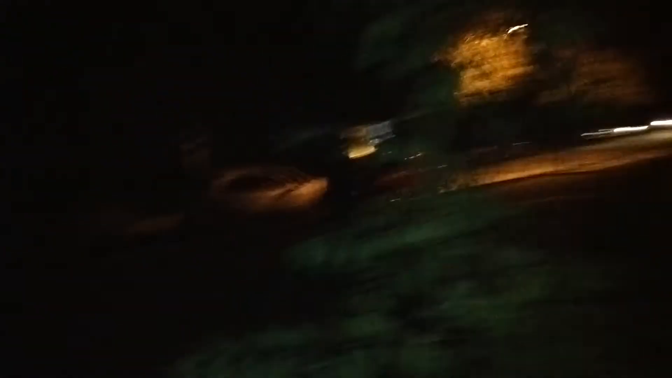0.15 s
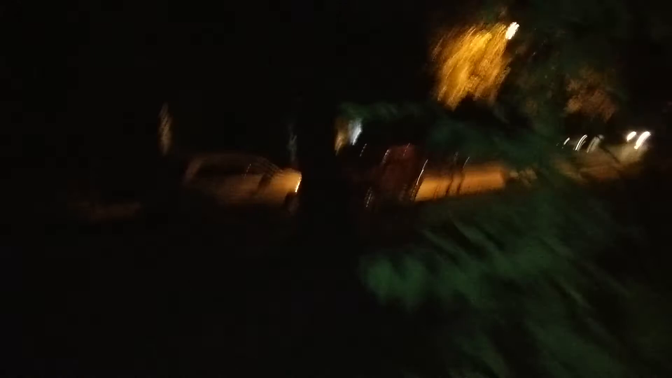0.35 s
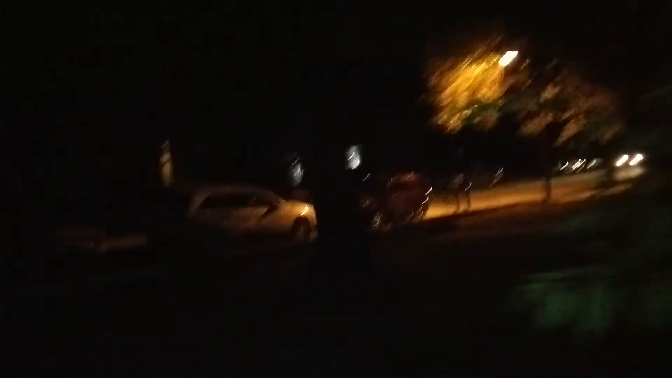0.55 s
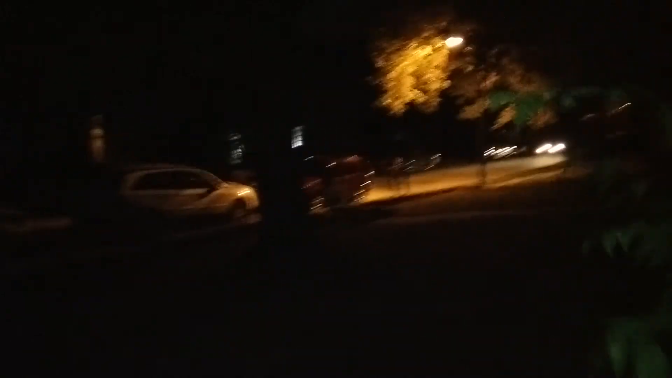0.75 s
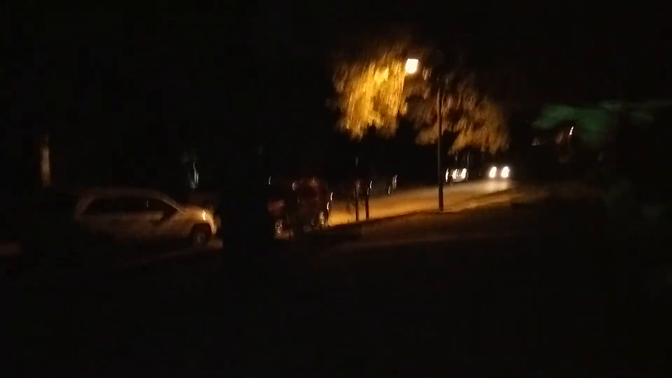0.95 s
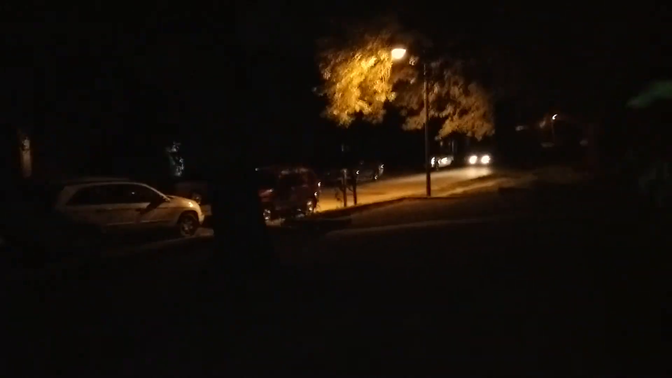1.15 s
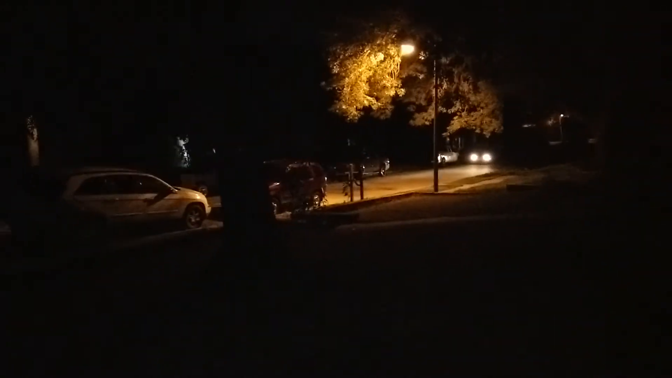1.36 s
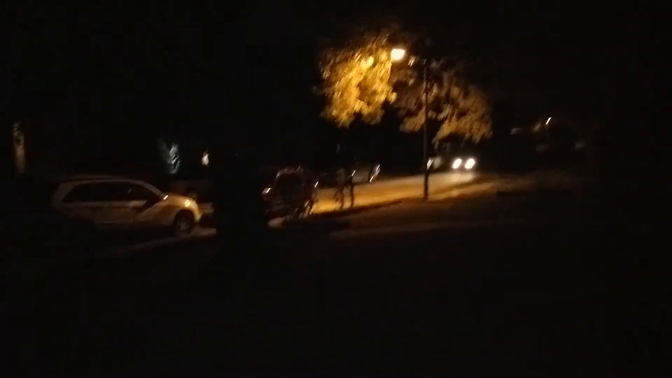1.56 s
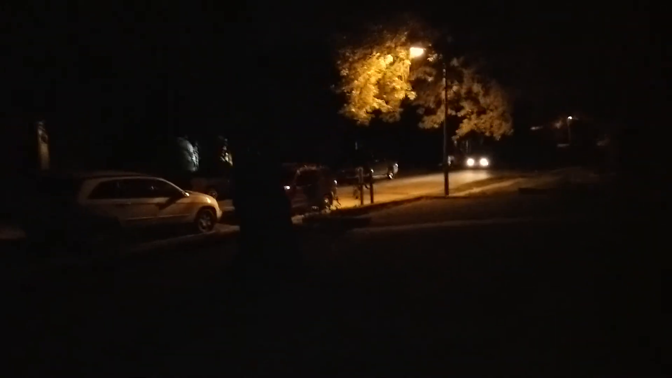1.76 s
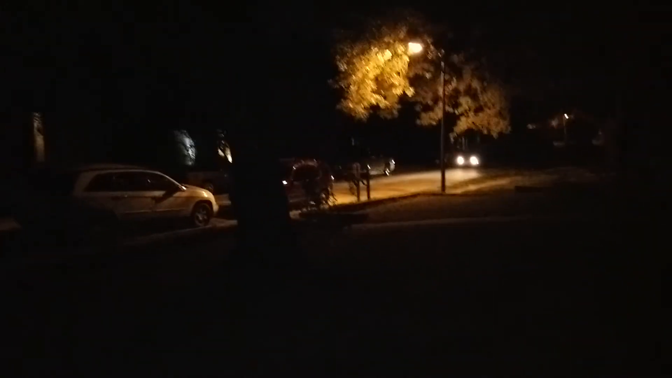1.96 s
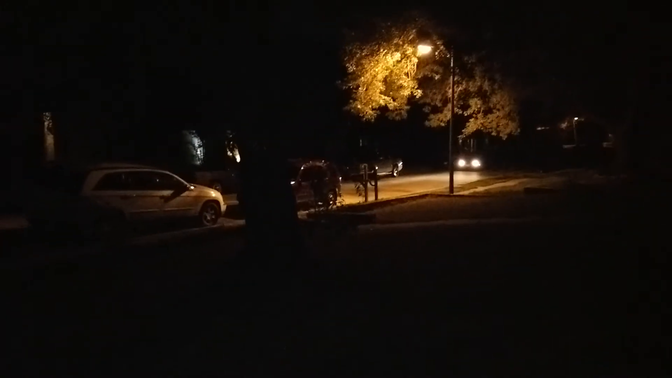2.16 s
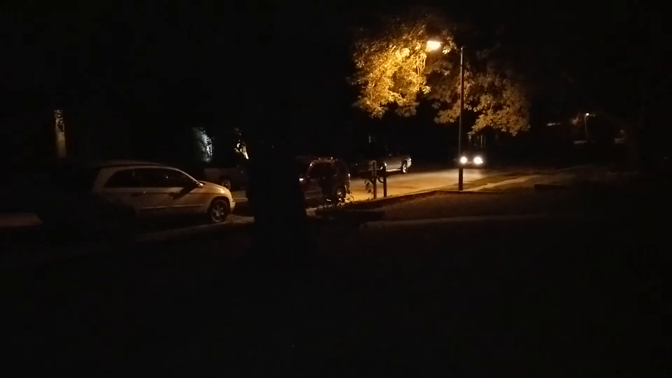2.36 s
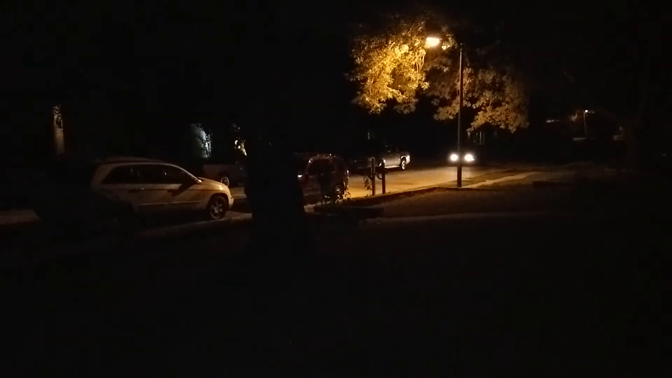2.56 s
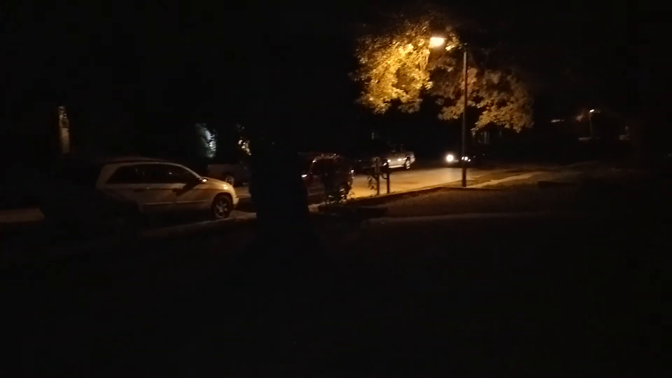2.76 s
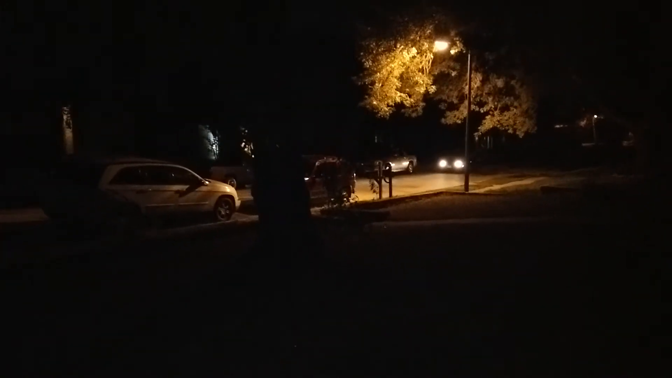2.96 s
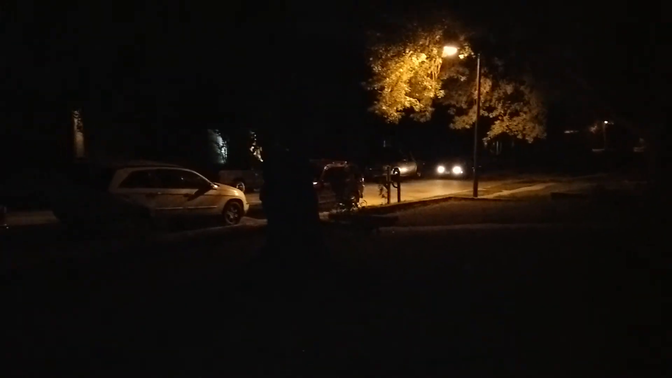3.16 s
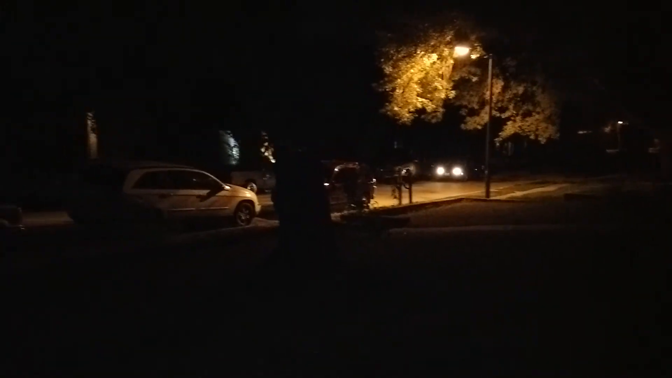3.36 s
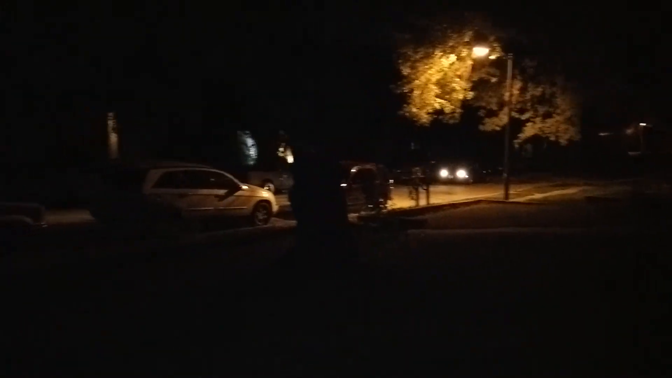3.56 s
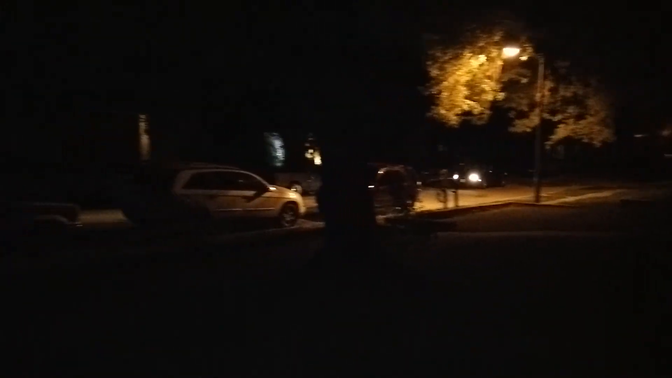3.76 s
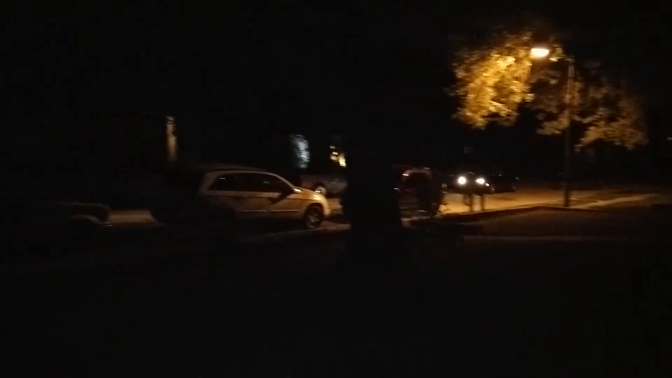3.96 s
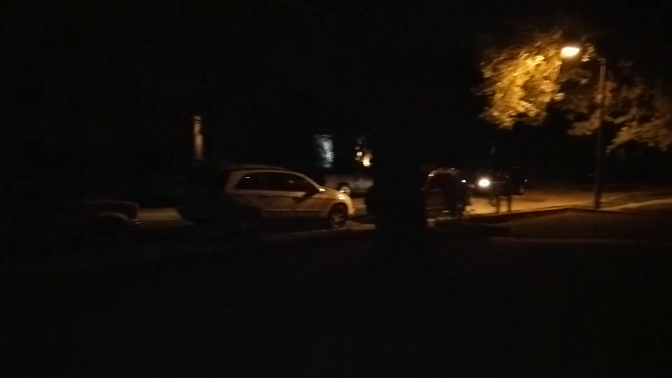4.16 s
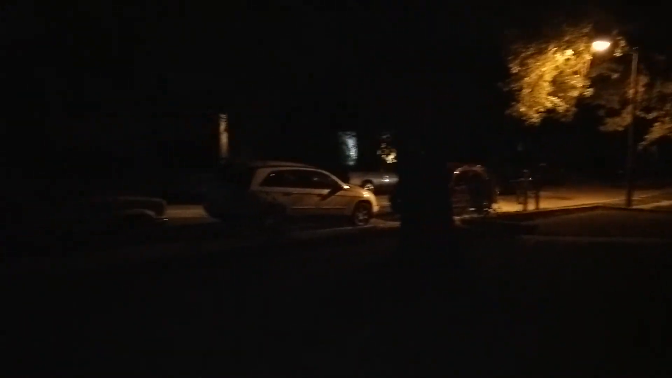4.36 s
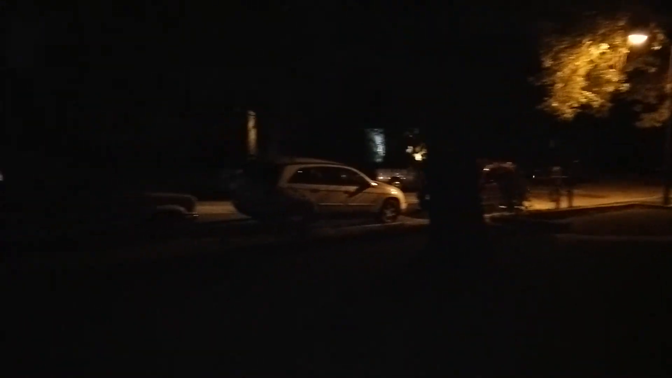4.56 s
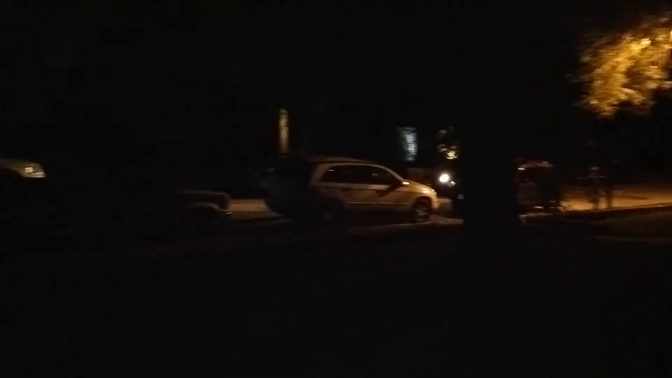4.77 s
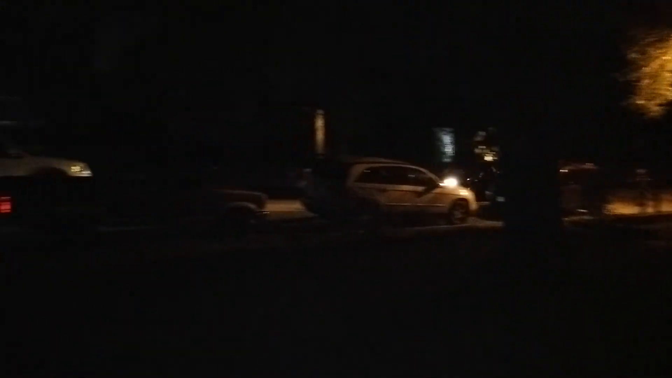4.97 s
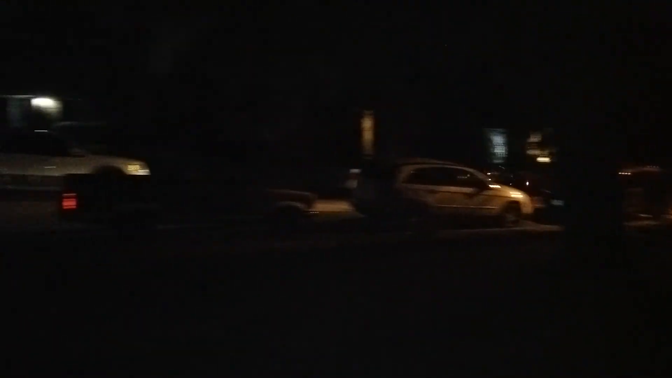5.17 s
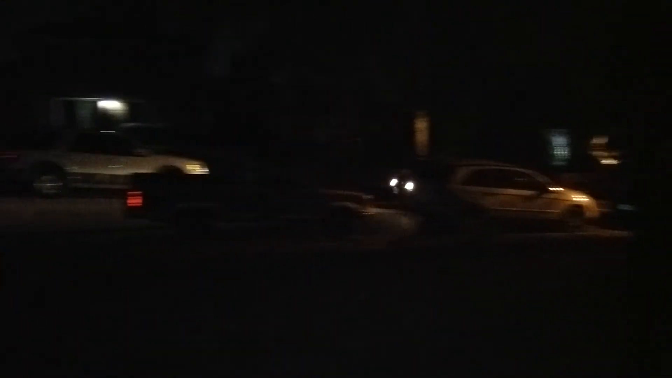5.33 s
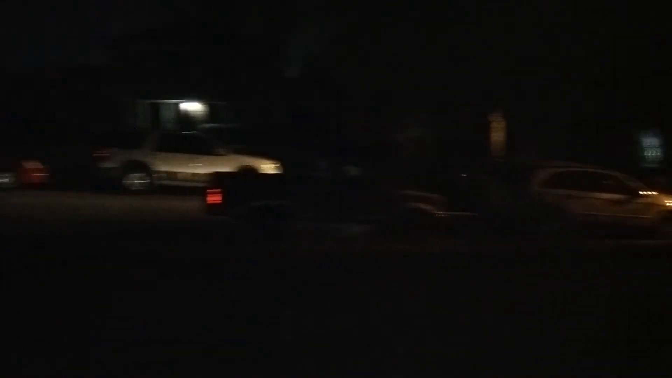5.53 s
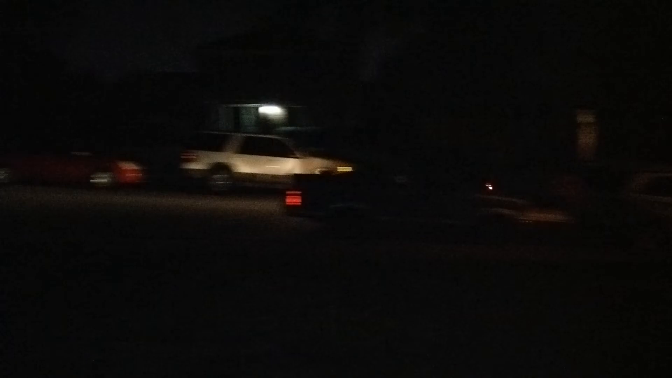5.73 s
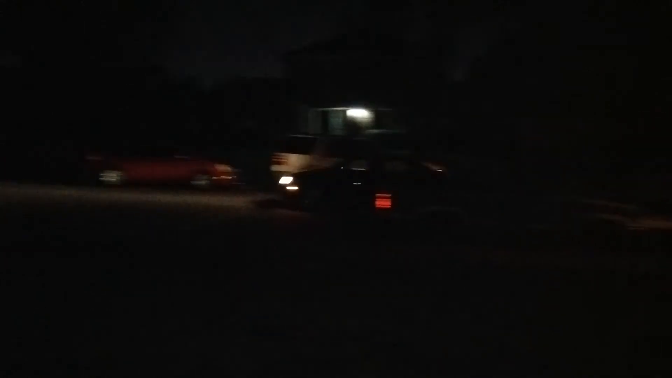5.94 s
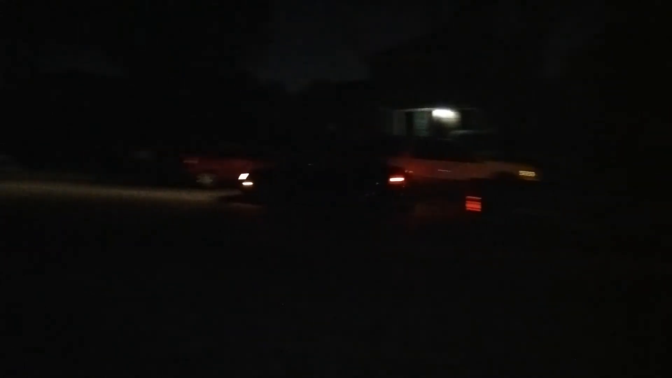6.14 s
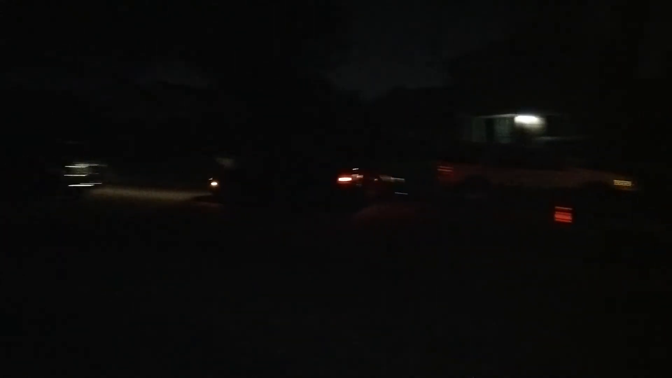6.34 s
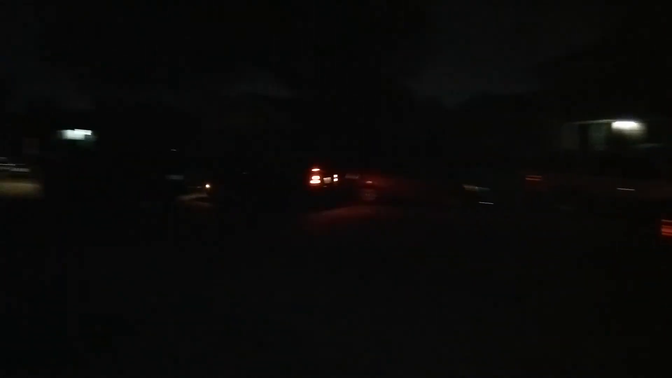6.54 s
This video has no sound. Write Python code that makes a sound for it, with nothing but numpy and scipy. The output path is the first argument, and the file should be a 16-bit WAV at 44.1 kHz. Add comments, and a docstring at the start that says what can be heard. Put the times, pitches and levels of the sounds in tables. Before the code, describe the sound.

Night street, microphone close to foliage, nearly everything in the right channel with the left faint and muffled. From 0 to 0.7 s, small twig ticks, knocks and leaf brushes over soft hiss, low rumble and a soft hand bump; a very faint far whine rises and falls. Thin insect trills stay barely audible. A distant car's low, steady bass drone emerges by 1 s, wavering slightly with a faint rattle, while leaves crackle most around 1.3-1.6 s and brush lightly until 2.2 s. At about 3.15 s the throttle opens: boomy exhaust bark, howl and tearing rasp burst in, pitch climbing in steps, the boom fluttering with echoes. From 4.3 s it grows nearer, brighter and harsher, peaking in a slightly overloaded roar at 5.7-6.05 s. The driver lifts off as it passes; pitch falls, with ragged burble, sharp pops at 6.3 s and smaller ones until the end at about 6.6 s.

```python
"""A six-cylinder car with a loud exhaust drones up a night street, opens up, roars past and lifts off.
Sine orders make the boom; pulses through the pipe's colours, with clean orders, make the bark; gated noise
makes the rasp. On the overrun ragged pulses burble and noise bursts pop.
Leaves and twigs, of noise and short decaying tones, rustle beside the microphone over hiss, rumble,
insects and a far whine. The left port is muffled, and the loudest peaks are rounded off."""
import sys
import numpy as np
from scipy import signal
from scipy.fft import rfft, irfft
from scipy.io import wavfile
from scipy.ndimage import uniform_filter1d

SR = 44100
rng = np.random.default_rng(int(sys.argv[2]) if len(sys.argv) > 2 else 0)


def store_wav(level_fs):
    """Save 16-bit WAV to argv[1]."""
    pcm = np.round(np.clip(np.atleast_2d(level_fs), -1, 1) * 32767)
    wavfile.write(sys.argv[1], SR, pcm.T.astype(np.int16))


N = 291060
TIME = np.arange(N) / SR

# Levels throughout are mix levels, ahead of the output gain; colours and swells are relative.
OUTPUT_DB = 7.0

# engine speed as heard: (time [s], firing rate [Hz])
FIRING = [(0, 109.4), (1.2, 114.3), (2.5, 114), (3.12, 116.7), (3.25, 121.7), (3.45, 122), (3.7, 134.3),
          (3.92, 135.8), (4.3, 154.2), (4.88, 181.3), (5.2, 182), (5.4, 197), (5.75, 215), (6.0, 212.4),
          (6.14, 186), (6.6, 155.5)]
# one engine cycle with unequal headers, scaled where used: (strength [dB], lateness [firing periods])
CYLINDERS = [(5, 0.073), (4.5, -0.046), (-3, -0.079), (-4, 0.029), (0.5, 0.09), (-1, -0.054)]
# the driver floors the throttle, then lifts off
OPEN_AT_S, OPEN_TAKES_S = 3.15, 0.051
LIFT_AT_S, LIFT_TAKES_S = 6.02, 0.079
# the pass: the moment when the car is nearest, its distance then, its speed
PASS_AT_S, DISTANCE_M, SPEED_M_PER_S = 6.074, 18.5, 15.8
TOP_HZ = 212.3  # firing rate at which the loudness laws below are set

# boom at light throttle, which also shapes the rattle: (time [s], level [dB])
DRONE = [(0.3, -36), (0.97, -32.5), (1.01, -29.5), (2.6, -29.5), (2.69, -26.5), (2.79, -31.5), (2.9, -27.5),
         (2.97, -32), (3.1, -28.5)]
# octave of the drone: (time [s], level [dB])
DRONE_OCTAVE = [(.25, -52), (.9, -50.5), (2.05, -60.5), (2.4, -55), (3.12, -51.5)]
# pipe resonances that the firing tone climbs through under load: (frequency [Hz], level [dB])
PIPE = [(121, -18.5), (124, -17), (135, -18), (142, -24.5), (160, -17.5), (172, -15), (186, -15),
        (212, -15.5)]
# the same for its octave: (frequency [Hz], level [dB])
PIPE_OCTAVE = [(240, -39.5), (252, -28.5), (272, -31), (296, -37), (400, -55)]
DRONE_TRIM_DB, PIPE_TRIM_DB = 1.0, 3.0  # added to the firing tone's drone and pipe levels
# the boom fades briefly as echoes cancel it: (time [s], half length [s], change [dB])
FADES = [(3.66, 0.044, -4), (3.795, 0.012, -7), (3.96, 0.063, -13), (4.15, 0.054, -8), (4.315, 0.019, -10),
         (4.825, 0.015, -15), (4.96, 0.032, -9), (5.05, 0.019, -14), (5.16, 0.034, -18.5),
         (5.308, .016, -11), (5.432, 0.017, -12), (5.515, 0.015, -14), (5.585, .025, -9.5),
         (5.81, .028, -9.5)]
# the lope of uneven firing swells or sinks: (time [s], half length [s], change [dB])
LOPES = [(5.35, 0.042, 10.5), (5.59, 0.072, -15)]
LOPE_DB, LOPE_DB_PER_OCTAVE, LOPE_LEAST_DB = -28.5, 139, -44.5

# bark of the pipe, far off: (frequency [Hz], level [dB])
BARK_FAR = [(50, -46), (170, -27), (280, 5), (400, 1), (500, -4), (600, 1), (800, -7), (1040, -7),
            (1400, -10.5), (2000, -13), (3000, -29)]
# bark of the pipe, near: (frequency [Hz], level [dB])
BARK_NEAR = [(170, -26.5), (300, 1.5), (420, -0.5), (510, -4.5), (620, 6), (730, -5), (850, 0.5),
             (1040, -5.5), (1200, -2.5), (1450, -18), (2000, -5), (2600, -1.5), (4000, -29.5)]
# clean orders within the bark: (multiple of the firing rate, far level [dB], near level [dB])
HOWL = [(2, -65, -10), (3, -1.5, -17), (4, -2, -17), (5, -10, -5.5), (6, -16, -9.5), (7, -25, -13),
        (10, -16, -16)]
# the exhaust flares up or slackens: (time [s], half length [s], bark change [dB], rasp change [dB])
FLARES = [(3.73, 0.6, 2, 5.5), (4.404, 0.29, 0, 4.5), (4.787, .06, -2.5, -2), (5.126, 0.11, 3, 4),
          (5.296, 0.041, -0.5, 0), (5.425, 0.057, -0.5, -1.5), (5.578, .065, 4.5, 7.5),
          (5.941, 0.026, -5, 5), (6.046, 0.045, 4.5, 6.5)]
BARK_DB, BARK_DB_PER_OCTAVE = -23.5, 10.5
ROUGH_DB, ROUGH_DB_PER_OCTAVE = -4, 2  # the bark grows rougher with the revs
HOWL_DB, HOWL_DB_PER_OCTAVE = -6, -2.5  # and its clean orders stand out less

# rasp of the gas, far off: (frequency [Hz], level [dB])
RASP_FAR = [(80, -40), (530, -13), (900, -5), (1130, -1.5), (1240, -25), (1320, -7), (2060, -2.5),
            (2410, -7.5), (2980, -4.5), (3370, -1), (4600, -9), (6280, -2.5), (6660, -3.5), (8990, -20.5),
            (15100, -35), (15800, -78.5)]
# rasp of the gas, near: (frequency [Hz], level [dB])
RASP_NEAR = [(530, -23.5), (900, -15), (1030, 0.5), (1130, -6), (1370, -11.5), (1800, -3), (1960, -7),
             (2110, -3), (2520, -17.5), (3130, -7.5), (5120, -11.5), (6200, -7), (9100, -25.5),
             (12000, -33.5), (15800, -37)]
# narrow tailpipe resonances, each stirred most at certain revs:
# (frequency [Hz], width [Hz], level against the rasp [dB], firing rate [Hz], reach [octaves])
TAILPIPE = [(960.2, 220, -13, 159, 0.19), (2000, 170, -10.5, 157, 0.22), (3043.5, 730, -19.5, 156.25, 0.25),
            (3747, 130, -9.5, 127, 0.19), (4180, 160, -16.5, 135, 0.47)]
RASP_DB, RASP_DB_PER_OCTAVE = -22.5, 14
RASP_BUILD_S = 0.047  # the gas flow takes a moment to build
RASP_FALL_DB_PER_S, RASP_SHUT_DB = 58, -25  # after lifting off, down to a murmur

# burble with the throttle shut: (frequency [Hz], level [dB])
BURBLE_COLOUR = [(30, -39), (60, -10), (88, -6), (125, 2), (165, 5), (210, -16.5), (300, -22), (500, -61.5)]
# blat of the pipe with the throttle shut: (frequency [Hz], level [dB])
BARK_SHUT = [(170, -30), (260, 5), (350, -6.5), (430, 3.5), (600, 6.5), (780, -8.5), (1000, -7),
             (1300, -11), (2000, -11.5), (3500, -28), (7000, -37)]
# backfires: (time [s], crack level [dB], crack decay [s], pipe blat level [dB])
POPS = [(6.313, -14, 0.0054, -17.5), (6.331, -26, 0.04, -37), (6.4, -38, 0.022, -20),
        (6.497, -49, 0.012, -30)]
# crack of a backfire: (frequency [Hz], level [dB])
POP_COLOUR = [(200, -1), (600, 15.5), (1600, 8.5), (2600, 7), (4000, 5), (6800, 12), (9000, -4),
              (15500, -9)]
BURBLE_DB, BURBLE_LUMPS_DB = -17, -0.1
BLAT_DB, BLAT_FALL_DB_PER_S, BLAT_LEAST_DB = -9, 136, -39.5
POP_BLAT_RISE_S, POP_BLAT_S = 0.011, 0.015

# cylinder rattle at light throttle: (frequency [Hz], level [dB])
CRUISE_COLOUR = [(75, -30.5), (133, 8.5), (185, -10.5), (245, -19), (290, -0.5), (340, 4), (400, -8),
                 (520, -12.5), (600, -23), (670, -13), (800, -41)]
RATTLE_DB, RATTLE_DB_PER_S = -24.5, 1.4  # against the drone, growing as the car comes on

# leaves brushing by: (time [s], level [dB], half length [s], crackle share [0-1])
RUSTLES = [(0.027, -52, 0.018, 0.35), (0.28, -61, 0.018, 0.7), (.42, -51.5, 0.011, 0.4),
           (0.886, -59, 0.036, .8), (1.176, -56, 0.018, 0.2), (1.355, -43, 0.024, 0.36),
           (1.45, -49.5, 0.057, 0.77), (1.547, -47.5, 0.021, 0.6), (1.609, -42.5, 0.022, 0.24),
           (1.733, -54, .012, .1), (1.982, -57, .025, 0.1), (2.197, -48, 0.02, 0)]
# swish of leaves: (frequency [Hz], level [dB])
LEAF_COLOUR = [(800, -31), (4000, -10), (5500, 0), (7000, 5.5), (9000, -4.5), (12000, -21), (15500, -18)]
# crackle of leaves: (frequency [Hz], level [dB])
CRACKLE_COLOUR = [(400, -12), (1300, -2), (4000, -9), (7000, 4), (10000, -4.5), (15500, -14)]
# twig ticks and soft knocks: (time [s], starting level [dB], pitch [Hz])
TICKS = [(.077, -38, 1130), (0.159, -56, 4770), (0.271, -38, 6160), (0.284, -35, 6030), (0.317, -39, 6700),
         (.433, -41, 7000), (.46, -43, 6300), (.484, -37, 880), (0.527, -36, 900), (0.687, -46, 6500)]

# hiss of the street: (frequency [Hz], level [dB])
NIGHT = [(30, -17), (120, 5), (300, 13), (700, 1), (1700, -2), (2500, -5.5), (3400, -3), (4600, -4),
         (5500, -0.5), (6600, 0.5), (8000, -8), (10000, -18.5), (15800, -17.5)]
HISS_DB, HISS_DB_PER_S = -56.5, 2.24  # growing as the car comes on
# town rumble, then the bump of a hand: (frequency [Hz], level [dB])
RUMBLE_COLOUR = [(25, -32), (55, -5), (120, 5), (400, -49)]
THUD_COLOUR = [(25, -24), (70, 7), (130, 0.5), (400, -42.5)]
# insects trilling far off: (pitch [Hz], width [Hz], first level [dB], later level [dB])
INSECTS = [(3110, 100, -93, -66), (4120, 90.3, -69, -65), (5370, 240, -64.5, -65)]
# a faint far whine that rises and falls: (time [s], pitch [Hz], level [dB])
WHINE = [(.2, 480, -70), (.4, 521, -64), (.65, 580, -60.5), (.9, 539, -61), (1.15, 488, -67)]

# decay of the street's echo: (frequency [Hz], time to fall 60 dB [s])
STREET = [(100, 1), (1000, 1), (4000, 1), (12000, 0.43)]
# muffled left port against the right: (frequency [Hz], gain [dB])
LEFT_PORT = [(50, -15), (110, -14), (200, -21.5), (380, -28.5), (700, -35), (2400, -43), (4400, -52),
             (8000, -87), (15000, -36)]
# self-noise in the left port: (frequency [Hz], level [dB])
SELF_NOISE_COLOUR = [(20, -4), (60, -6), (300, -16), (1500, -28.5), (8000, -36.5), (14000, -33)]
EDGE_HZ = 15800  # upper band limit


def boom(turns, throttle):
    """The pipe's lowest orders, nearly pure; echoes of the rising pitch lag behind and blur it."""
    angle, hz = 2 * np.pi * turns, curve(FIRING)
    cycle = 1 / len(CYLINDERS)
    # sidebands one engine cycle above and below the firing rate
    cycle_beat = 0.078 * np.sin(angle * (1 + cycle)) + 0.089 * np.sin(angle * (1 - cycle))
    tone = steady(street(np.sin(angle), wet_db=-3.5), size=1600) / np.sqrt(2)
    drone_gain = amp(DRONE_TRIM_DB) * level(DRONE)
    load_gain = amp(PIPE_TRIM_DB) * throttle * amp(read(PIPE, hz)) * swells(FADES)
    firing_tone = (drone_gain + load_gain) * (tone + cycle_beat)

    octave = steady(street(np.sin(2 * angle + 0.55 * wander(19)), wet_db=-4.5))
    octave_gain = level(DRONE_OCTAVE) + throttle * amp(read(PIPE_OCTAVE, 2 * hz))

    half_order = np.sin(angle / 2 + 0.44 * wander(27))
    third_order = 0.094 * nearness() * np.sin(2 * angle * cycle)
    lope = (1 + 0.43 * wander(11.0)) * (half_order + third_order)
    lope_level = amp(LOPE_LEAST_DB) + amp(LOPE_DB + LOPE_DB_PER_OCTAVE * revs())
    lope_gain = throttle * spreading() * lope_level * swells(LOPES)
    return firing_tone + octave_gain * octave + lope_gain * lope


def bark(turns, throttle):
    """Under load, hard pulses ring the pipe, and a stack of clean orders climbs through them."""
    pulses = firings(turns, uneven_db=6, jitter=.022, skew=0.48)
    rough = steady(street(approach(pulses, BARK_FAR, BARK_NEAR), wet_db=5.5))
    near = nearness()
    stack = 0
    for multiple, far_db, near_db in HOWL:
        order = np.sin(2 * np.pi * multiple * turns + 0.76 * wander(27.0))
        stack = stack + amp(far_db + near * (near_db - far_db)) * order
    howl = steady(street(stack, wet_db=-7.0))
    rough_gain = amp(ROUGH_DB + ROUGH_DB_PER_OCTAVE * revs())
    howl_gain = amp(HOWL_DB + HOWL_DB_PER_OCTAVE * revs())
    flares = swells((s, length, db) for s, length, db, _ in FLARES)
    gain = throttle * spreading() * amp(BARK_DB + BARK_DB_PER_OCTAVE * revs()) * flares
    return gain * (rough_gain * rough + howl_gain * howl)


def rasp(turns):
    """Each firing tears a puff of turbulent gas from the pipe; its resonances flutter in and out."""
    strength_db = np.array(CYLINDERS)[turns.astype(int) % len(CYLINDERS), 0]
    gate = 1.1 + amp(0.66 * strength_db) * np.exp(-(turns % 1) / 0.79)
    turbulence = amp(1.3 * wander(83)) * rng.standard_normal(N)
    puffs = street(gate * turbulence, wet_db=-5.0)
    gas = approach(puffs, RASP_FAR, RASP_NEAR)
    for hz, width, db, rate_hz, reach in TAILPIPE:
        stirred = np.exp(-(np.log2(curve(FIRING) / rate_hz) / reach) ** 2)
        ring = unit(signal.lfilter(*signal.iirpeak(hz, hz / width, SR), puffs))
        gas = gas + stirred * amp(db + 4.1 * wander(22)) * ring
    build_up = 1 - np.exp(-(np.maximum(TIME - OPEN_AT_S, 0) / RASP_BUILD_S) ** 2)
    flow = build_up * amp(np.maximum(-RASP_FALL_DB_PER_S * since_lift(), RASP_SHUT_DB))
    flares = swells((s, length, db) for s, length, _, db in FLARES)
    return flow * spreading() * amp(RASP_DB + RASP_DB_PER_OCTAVE * revs()) * flares * steady(gas)


def overrun(turns, shut):
    """With the throttle shut the cylinders fire raggedly, and unburnt fuel cracks in the pipe."""
    ragged = street(firings(turns, uneven_db=4.5, jitter=.5, skew=0.95), wet_db=2)
    # skipped firings put a lumpy tone below the firing rate
    misfire = np.sin(2 * np.pi * turns * 4 / len(CYLINDERS) + .7 * wander(20))
    lumps = steady(steady(colour(ragged, BURBLE_COLOUR)) + misfire, size=2200)
    burble = shut * amp(BURBLE_DB + BURBLE_LUMPS_DB * wander(14)) * lumps

    falling = amp(BLAT_DB - BLAT_FALL_DB_PER_S * since_lift())
    blat_gain = shut * (falling + amp(BLAT_LEAST_DB) * spreading())
    blasts = 0
    for s, crack_db, decay, blat_db in POPS:
        kick = ramp(s, POP_BLAT_RISE_S) * np.exp(-abs(TIME - s) / POP_BLAT_S)
        blat_gain = blat_gain + amp(blat_db) * kick
        blasts = blasts + amp(crack_db) * (TIME >= s) * np.exp(-abs(TIME - s) / decay)
    blat = blat_gain * steady(street(colour(ragged, BARK_SHUT), wet_db=-5), size=2000)
    cracks = blasts * unit(colour(rng.standard_normal(N), POP_COLOUR))
    return burble + blat + street(cracks, wet_db=-8.0)


def cruise(turns):
    """At light throttle unlike cylinders give a comb of lines, lifted on multiples of the firing rate."""
    cycles, cycle_hz = turns / len(CYLINDERS), FIRING[1][1] / len(CYLINDERS)
    comb = 0
    for k in range(4, 42):
        line_db = read(CRUISE_COLOUR, k * cycle_hz) + 5.3 * (k % len(CYLINDERS) == 0)
        comb = comb + amp(line_db) * np.sin(2 * np.pi * (k * cycles + rng.random()))
    rattle = steady(street(comb * (1 + 0.39 * wander(16)), wet_db=-3.0))
    return amp(RATTLE_DB + RATTLE_DB_PER_S * TIME) * level(DRONE) * rattle


def leaves():
    """Leaf friction as swells of swish and separate crackles; twigs as short decaying tones."""
    swish = unit(colour(rng.standard_normal(N) * amp(1.9 * wander(400)), LEAF_COLOUR))
    snaps = (rng.random(N) < 1500 / SR) * rng.standard_normal(N)  # about 1500 a second
    crackle = unit(colour(snaps, CRACKLE_COLOUR))
    out = np.zeros(N)
    for s, db, length, dryness in RUSTLES:
        brush = amp(db) * np.exp(-((TIME - s) / length) ** 2)
        out += brush * ((1 - dryness) * swish + dryness * crackle)
    for s, db, hz in TICKS:
        t = TIME[:SR // 20]
        tick = amp(db) * np.exp(-t / 0.00089) * np.sin(2 * np.pi * hz * t)
        out[round(s * SR):][:len(tick)] += tick
    return out


def night():
    """Distant tyres and town hum as coloured noise, insects and a far whine as tones, a hand's bump."""
    air = amp(HISS_DB + HISS_DB_PER_S * TIME) * unit(colour(rng.standard_normal(N), NIGHT))
    rumble = amp(-50.5) * unit(colour(rng.standard_normal(N), RUMBLE_COLOUR))
    trills = 0
    for hz, width, first_db, later_db in INSECTS:
        pitch = hz + width / 2 * wander(130)
        gain = amp(np.interp(TIME, [.8, 1.8], [first_db, later_db]))
        trills = trills + gain * np.sin(2 * np.pi * np.cumsum(pitch) / SR)
    whine_angle = 2 * np.pi * np.cumsum(curve(WHINE)) / SR + 0.93 * wander(22)
    whine = level(WHINE, order=2) * np.sin(whine_angle)
    bump = amp(-46.5) * np.exp(-((TIME - .15) / 0.21) ** 2)
    thud = bump * unit(colour(rng.standard_normal(N), THUD_COLOUR))
    return air + rumble + trills + whine + thud


def firings(turns, uneven_db, jitter, skew):
    """One click a firing; its size and moment depend on its cylinder (by skew) and on chance."""
    at = np.flatnonzero(np.diff(np.floor(turns)))
    size, late = rng.standard_normal((len(at), 2)).T
    strength_db, lag = np.resize(CYLINDERS, (len(at), 2)).T
    shift = (skew * lag + jitter * late) * np.gradient(at)
    place = np.clip(at + shift, 0, N - 1).astype(int)
    return np.bincount(place, amp(skew * strength_db + uneven_db * size), N)


def street(x, wet_db):
    """Adds scattered echoes from houses, trees and parked cars."""
    taps = rng.standard_normal(SR) * (rng.random(SR) < .05) * (TIME[:SR] > .006)
    hz, t, bands = signal.stft(taps, SR, nperseg=256)
    decay = amp(-60 * t / read(STREET, hz)[:, None])
    tail = signal.istft(bands * decay, SR)[1]
    return x + amp(wet_db) * signal.oaconvolve(x, tail / np.linalg.norm(tail))[:N]


def approach(x, far, near):
    """Crossfades a sound from its far colour to its near one as the car comes on."""
    return (1 - nearness()) * unit(colour(x, far)) + nearness() * unit(colour(x, near))


def nearness():
    """0 while the car is far up the street, 1 when it is close."""
    return np.interp(TIME, [4.2, 5.4], [0, 1])


def spreading():
    """Sound weakens with distance: 1 at the nearest point."""
    return DISTANCE_M / np.hypot(DISTANCE_M, SPEED_M_PER_S * (TIME - PASS_AT_S))


def revs():
    """Engine speed in octaves relative to TOP_HZ, negative below it."""
    return np.log2(curve(FIRING) / TOP_HZ)


def since_lift():
    """Seconds since the driver lifted off, 0 before."""
    return np.maximum(TIME - LIFT_AT_S, 0)


def ramp(start, length):
    """Rises from 0 to 1."""
    return np.clip((TIME - start) / length, 0, 1)


def swells(rows):
    """Gain of bell-shaped rises or dips, from rows of (time [s], half length [s], change [dB])."""
    return amp(sum(db * np.exp(-((TIME - s) / length) ** 2) for s, length, db in rows))


def amp(db):
    """Decibels to gain."""
    return 10 ** (np.asarray(db) / 20)


def unit(x):
    """Scales to rms 1."""
    return x / np.sqrt(np.mean(x ** 2) + 1e-20)


def steady(x, size=6000):
    """Holds a sound near rms 1 over a window in samples, keeping its fast flutter."""
    power = uniform_filter1d(uniform_filter1d(x ** 2, size), size // 2)
    return x / np.sqrt(abs(power) + 1e-12)


def wander(hz):
    """Slow chance of rms 1, rolled off above the given rate."""
    rolloff = 1 + (np.fft.rfftfreq(N, 1 / SR) / hz) ** 4
    return unit(irfft(rfft(rng.standard_normal(N)) / rolloff, N))


def curve(rows, order=1):
    """One column of a time table at every sample."""
    rows = np.array(rows)
    return np.interp(TIME, rows[:, 0], rows[:, order])


def level(rows, order=1):
    """Gain from a dB column, corners rounded, dying away outside the table's span."""
    outside = np.maximum(np.maximum(rows[0][0] - TIME, TIME - rows[-1][0]), 0)
    return uniform_filter1d(amp(curve(rows, order)) * np.exp(-outside / 0.082), size=350)


def read(points, hz):
    """A spectrum's value on a log-frequency axis."""
    f, value = np.transpose(points)
    return np.interp(np.log(hz + 1), np.log(f), value)


def colour(x, points):
    """Causal minimum-phase filter with the given spectrum, floored at -100 dB."""
    gain_db = np.maximum(read(points, abs(np.fft.fftfreq(8192, 1 / SR))), -100)
    log_gain = np.log(amp(gain_db))
    taps = np.fft.ifft(np.exp(np.conj(signal.hilbert(log_gain)))).real
    return signal.oaconvolve(x, taps[:len(taps) // 2])[:N]


def scene():
    """The car and the street, heard through one muffled port (left) and one open port (right)."""
    turns = np.cumsum(curve(FIRING) * (1 + .004 * wander(17))) / SR  # firings so far
    shut = ramp(LIFT_AT_S, LIFT_TAKES_S)
    throttle = ramp(OPEN_AT_S, OPEN_TAKES_S) * (1 - shut)
    car = boom(turns, throttle) + bark(turns, throttle) + rasp(turns) + overrun(turns, shut) + cruise(turns)
    sound = car + leaves() + night()
    self_noise = amp(-74.5) * unit(colour(rng.standard_normal(N), SELF_NOISE_COLOUR))
    return amp(OUTPUT_DB) * np.array([colour(sound, LEFT_PORT) + self_noise, sound])


def record(dry):
    """The loudest peaks are rounded off at full scale; then the band limit."""
    squashed = dry / (1 + dry ** 8) ** (1 / 8)
    lowpass = signal.firwin(511, EDGE_HZ, window=("kaiser", 9), fs=SR)
    return signal.oaconvolve(squashed, lowpass[None], "same")


dry = scene()
out = record(dry)
store_wav(out)
```